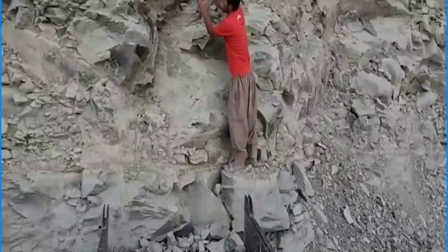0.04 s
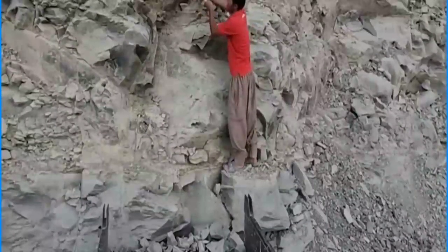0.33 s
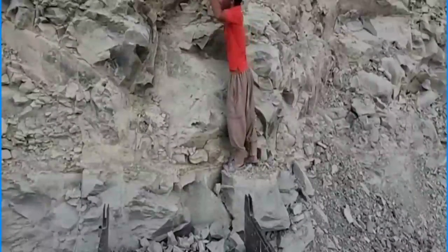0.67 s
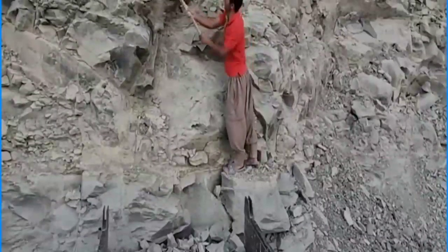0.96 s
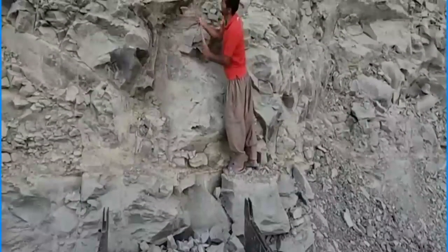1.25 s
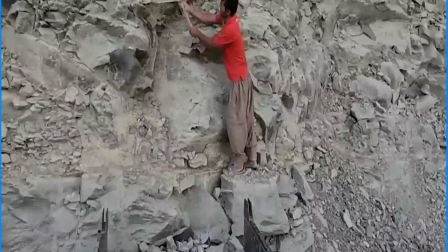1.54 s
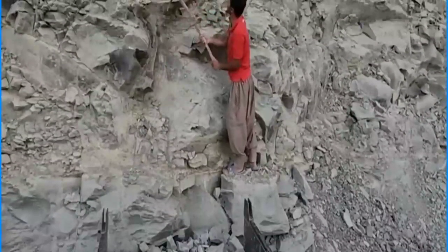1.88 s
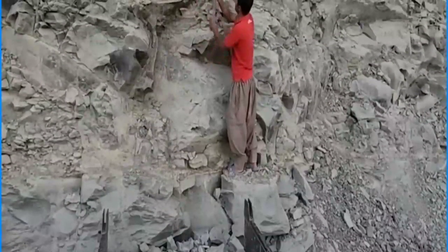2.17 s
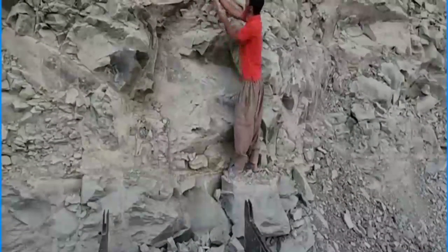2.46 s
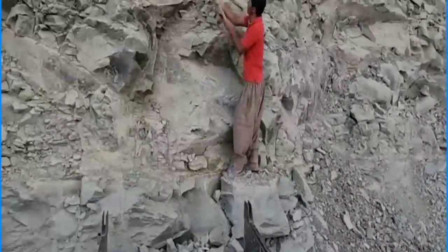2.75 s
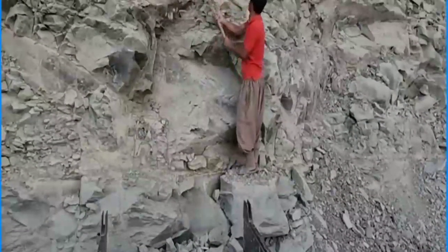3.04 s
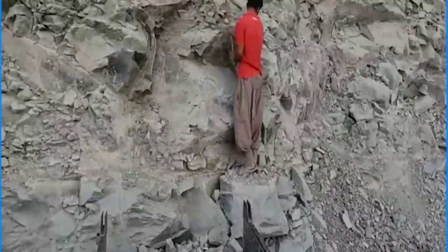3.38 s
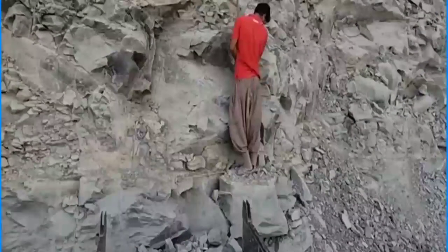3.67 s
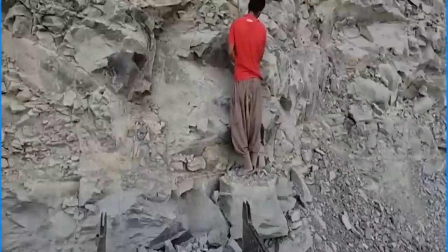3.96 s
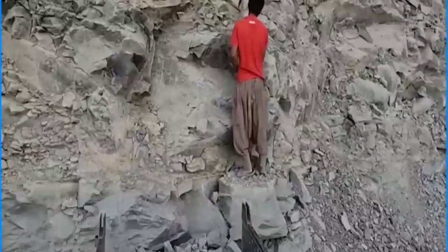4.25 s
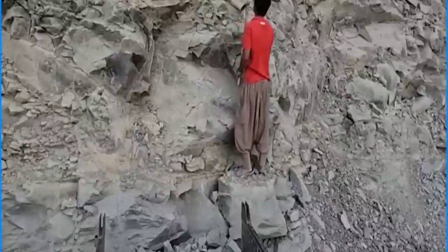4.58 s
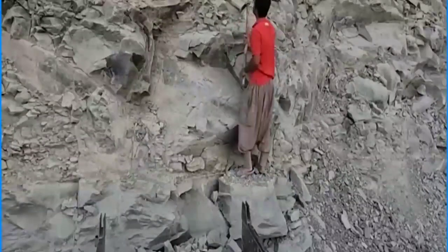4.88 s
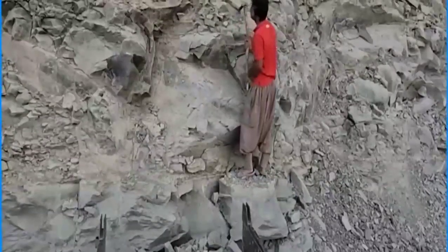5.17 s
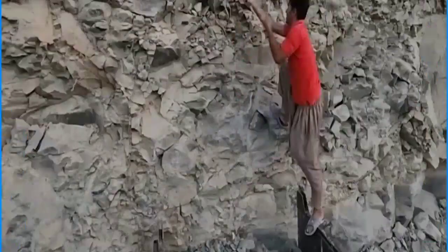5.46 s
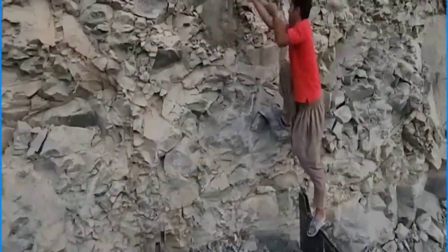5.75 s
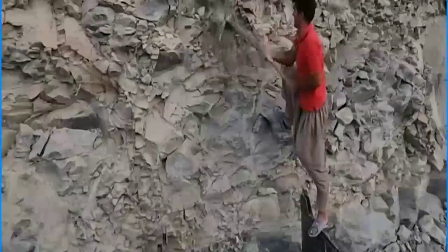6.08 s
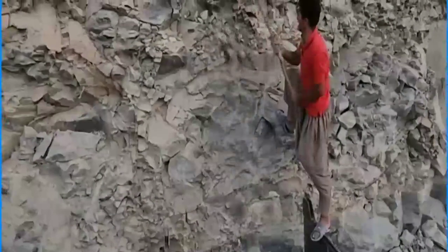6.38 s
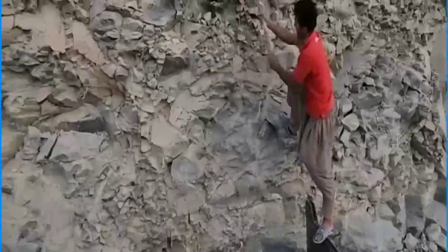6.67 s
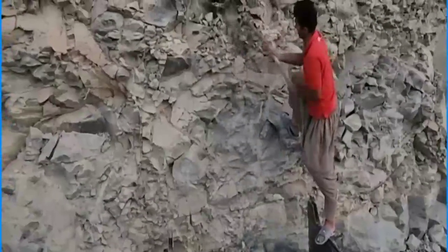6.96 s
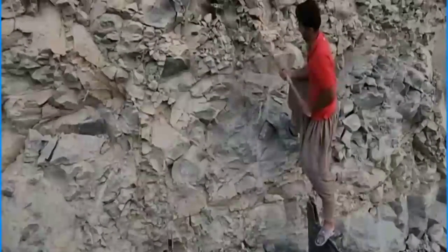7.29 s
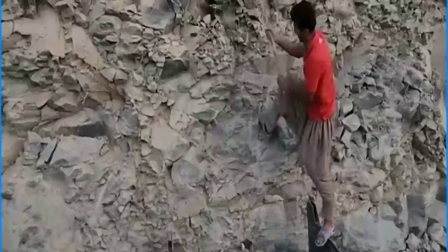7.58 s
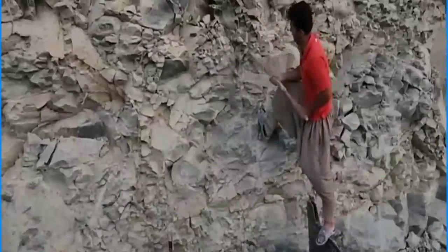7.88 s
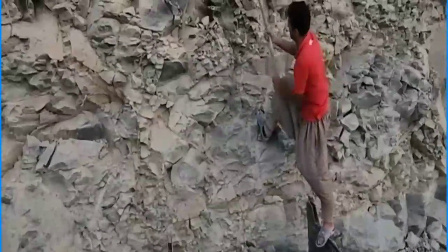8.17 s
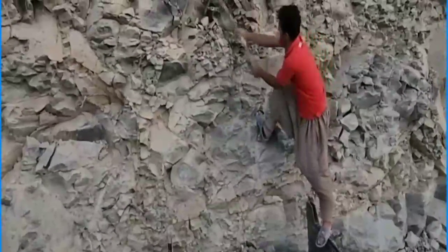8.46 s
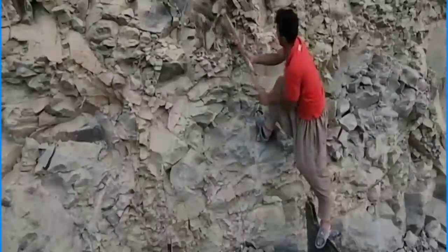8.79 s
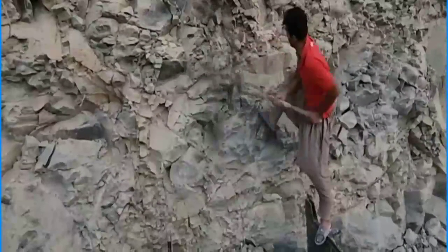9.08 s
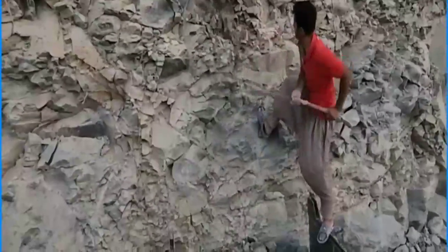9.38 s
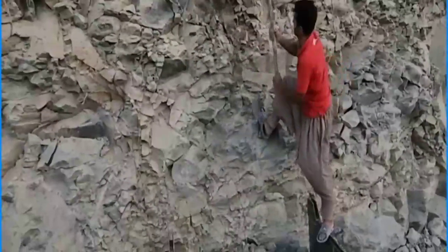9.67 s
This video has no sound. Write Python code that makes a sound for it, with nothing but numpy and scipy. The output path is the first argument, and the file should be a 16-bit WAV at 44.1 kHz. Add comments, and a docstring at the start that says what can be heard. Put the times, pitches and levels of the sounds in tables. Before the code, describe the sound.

A bar taps sharply on an outdoor quarry face, and stones crack loose, grinding and clinking down the slope with trickling pebbles and grit. Several clang and boom into a nearly empty steel truck bed. After a short lull with a puff of wind, a denser slide clatters onto the loaded bed, which thuds and rumbles. The sound is in stereo, with short echoes off the rock.

```python
"""Stones crack loose from a quarry face, pried with a bar, and clatter down into a steel truck bed.
Two closely spaced microphones hear the rock grind and clink, pebbles and grit trickle after it,
and short echoes come off the face. At first the bed is nearly empty and booms in its steel modes.
After a lull with a puff of wind on the microphones, a denser slide pours onto the load,
and the bed, its ring now shorter, thuds and rumbles."""
import sys
import numpy as np
from scipy import signal
from scipy.fft import rfft, irfft, next_fast_len
from scipy.io import wavfile
from scipy.ndimage import uniform_filter1d

SR = 44100
rng = np.random.default_rng(int(sys.argv[2]) if len(sys.argv) > 2 else 0)


def transcribe(u):
    """Save the signal u as a 16-bit wav file named by the first command-line argument.

    u: samples, shape (n,) or (channels, n), limited to [-1, 1]; the rate is SR.
    q: integer samples, one column per channel.
    """
    v = np.clip(np.atleast_2d(u).T, -1, 1)
    q = np.round(v * 32767).astype(np.int16)
    wavfile.write(sys.argv[1], SR, q)


N = 429093
TIME = np.arange(N) / SR
LEAD = 600  # samples of crushing before a stone gives way
CRUMBLE_S = 0.026  # hits that decay faster are clean taps, with little spray or spill

# louder stone hits: start_s, crack_db, thud_db, knock_db, fizz_db, decay_s, pitch_hz, clink_db
HITS = [(0.0473, -38.0, -59, -44, -38, 0.037, 1150, -42), (0.125, -27, -47, -38, -39, 0.026, 6600, -32),
        (0.191, -43, -62, -56, -49, 0.059, 7060, -42), (0.243, -36, -62, -47, -38, 0.03, 6520, -30),
        (0.337, -54, -55, -42, -51, 0.025, 2130, -46), (0.559, -52, -53, -42, -60.0, 0.03, 1260, -40),
        (0.6442, -26.5, -60.0, -37, -26, 0.015, 2060, -37), (0.677, -48, -62, -47, -52, 0.025, 2450, -45),
        (0.767, -33, -64.0, -42, -52.0, 0.033, 5400.0, -36), (0.829, -41, -58, -37, -55.0, 0.03, 1870, -42),
        (0.915, -49, -40, -33, -55, 0.022, 2310, -28), (0.964, -37, -62.0, -42, -62, 0.03, 2040, -32),
        (1.0145, -34.5, -47, -39, -47, 0.029, 2400, -40), (1.073, -53, -62, -44, -56, 0.028, 2020, -38),
        (1.1, -32, -28.5, -31.5, -36, 0.089, 1700, -34), (1.128, -30, -62.0, -35, -32.0, 0.055, 1350, -30),
        (1.149, -37, -32.5, -27, -48, 0.021, 1500, -25), (1.269, -31.0, -52, -35, -40, 0.04, 1670, -39),
        (1.282, -26, -33.5, -34, -32, 0.031, 1460.0, -35), (1.327, -30, -36, -30, -34, 0.026, 1270, -29),
        (1.378, -37, -58, -45, -44, 0.03, 2480, -41), (1.415, -22, -19, -26, -28, 0.09, 1500, -19),
        (1.4207, -16.5, -31, -14.5, -26, 0.13, 1143, -12.5),
        (1.5382, -30, -27, -29, -32.0, 0.21, 1040, -32), (1.594, -25, -35, -28, -36, 0.043, 1270, -25),
        (1.637, -25.5, -35, -36, -25, 0.027, 7500, -26), (1.662, -38, -31, -30, -46, 0.03, 1240, -26.5),
        (1.801, -41, -41, -45, -46, 0.024, 1270, -45), (1.896, -37.5, -44, -42, -43, 0.095, 1410, -42),
        (1.938, -35, -54, -42, -51, 0.04, 1850, -44), (1.973, -27, -32, -29.5, -38, 0.067, 990, -32),
        (2.021, -33, -51, -33, -40, 0.057, 6850.0, -31), (2.0852, -29, -47, -39, -30, 0.096, 6950, -27),
        (2.129, -43, -60, -43, -43, 0.022, 5900, -33), (2.194, -40, -50, -38.5, -50, 0.048, 4580, -44),
        (2.287, -25, -19.5, -25, -32, 0.17, 1393, -18), (2.375, -27, -52, -50, -45, 0.018, 6950, -32),
        (2.3894, -21, -47.0, -30, -31, 0.03, 5130, -23), (2.405, -31, -46, -24.5, -45, 0.026, 2240, -23),
        (2.4497, -40, -32, -30.5, -52.0, 0.16, 5100, -27), (2.472, -32, -40, -31, -42, 0.043, 1320, -34),
        (2.499, -35, -46, -34, -44, 0.033, 2060, -34), (2.534, -34, -42, -38, -45, 0.03, 2470, -36),
        (2.592, -39, -29.5, -31.5, -62, 0.046, 1530, -30.5), (2.692, -24, -43, -34, -27, 0.0092, 2300, -29),
        (2.7368, -28, -60, -37, -37, 0.13, 1240, -35), (2.76, -37, -55.0, -47, -49, 0.034, 5400, -30),
        (2.8055, -38, -47, -32, -55, 0.023, 2070, -29), (2.873, -33, -55, -34, -34, 0.03, 2130, -35),
        (2.916, -40, -56, -43, -47, 0.023, 7500, -42), (2.952, -43, -62, -40, -45, 0.03, 2130, -39),
        (2.998, -31, -61, -56, -67, 0.1, 4750, -32), (3.036, -22, -23, -27, -31, 0.13, 1250.0, -25),
        (3.0804, -37, -44, -22.5, -49.0, 0.02, 1045, -20), (3.1347, -31, -47, -47, -30, 0.072, 1500, -46),
        (3.1628, -18, -25, -28, -31, 0.024, 2500.0, -25), (3.187, -34, -42.5, -27, -46.0, 0.067, 2470, -25),
        (3.211, -29, -42.0, -27, -42.0, 0.018, 1100, -33), (3.239, -12, -34, -36, -29, 0.022, 5250, -23),
        (3.264, -24, -52, -32, -27, 0.042, 2620, -26), (3.3135, -22.5, -51, -26, -44.0, 0.15, 1860, -35),
        (3.34, -12, -15.5, -16.5, -24, 0.1, 1413, -15.5), (3.3559, -13.5, -29, -22, -23, 0.089, 1800, -22),
        (3.4195, -22.5, -43.0, -50, -22, 0.054, 5100, -21), (3.44, -20, -14, -38, -41, 0.045, 1520, -17.5),
        (3.478, -20.5, -45.0, -41, -35, 0.11, 7240.0, -22), (3.517, -22, -15, -20.5, -44, 0.12, 1120, -25),
        (3.5688, -8.5, -28, -13, -36, 0.064, 1115, -10.5),
        (3.5775, -19.5, -18, -33, -34, 0.12, 1390, -13.5), (3.679, -31, -45, -31, -33, 0.2, 1105, -23),
        (3.709, -19.5, -50, -44, -22, 0.11, 5900, -19), (3.789, -37, -41, -39, -37, 0.078, 1440, -39),
        (3.8357, -17, -45, -21.5, -45, 0.14, 2370, -34), (4.051, -37.5, -46, -42.5, -49, 0.24, 1200, -51),
        (4.102, -57, -33, -42, -57, 0.046, 1180, -39), (4.145, -42, -60, -66, -46, 0.02, 6500, -34.5),
        (4.439, -60, -73, -75, -53, 0.026, 6400, -66), (4.621, -63, -62, -66, -72.5, 0.017, 6300, -62.5),
        (4.675, -70.5, -56, -59, -76, 0.05, 1630, -62), (4.798, -65, -60.5, -72, -74, 0.019, 6320, -65),
        (4.9, -66, -51, -66, -72.0, 0.18, 5370, -63), (5.43, -66.5, -64, -59, -71, 0.05, 5500, -59),
        (5.5065, -21, -26, -22, -22, 0.12, 1476, -21.5), (5.647, -28, -58, -22, -33, 0.14, 3370, -16.5),
        (5.685, -30, -48, -38, -23, 0.052, 1104, -24.5), (5.824, -38, -34.5, -31.5, -29, 0.11, 1736, -28),
        (5.847, -33, -40, -34, -25.5, 0.036, 2240.0, -36), (5.916, -30, -57, -46, -31, 0.06, 2070.0, -31),
        (5.931, -21, -62, -31, -20.5, 0.32, 3000, -34), (5.9723, -18, -51.0, -32, -25, 0.067, 6480.0, -16),
        (5.986, -18, -47, -29, -20.5, 0.3, 4080, -20), (6.0657, -33, -41, -31, -23, 0.055, 940, -28),
        (6.0978, -13, -52, -23, -22, 0.13, 6670, -12), (6.164, -22, -57, -42.0, -17.0, 0.025, 7360, -24),
        (6.1824, -20.5, -44, -27, -18, 0.11, 2420, -21), (6.2114, -23, -58, -24, -22, 0.22, 1244, -25.5),
        (6.269, -24, -53, -37, -36, 0.06, 6780, -12), (6.305, -15, -48, -14, -20, 0.19, 1876, -16),
        (6.333, -12, -40, -30, -16, 0.18, 1244, -18), (6.428, -17.5, -20.5, -37, -40.0, 0.082, 6660, -18),
        (6.475, -22, -44, -25, -26, 0.16, 1880, -26), (6.507, -15, -25, -20, -26, 0.077, 4170, -13.5),
        (6.5534, -36, -25, -35, -22, 0.017, 910, -28), (6.639, -34, -43, -36, -39, 0.025, 1250, -33),
        (6.6733, -10, -38, -15.5, -18.5, 0.25, 2060, -16.5),
        (6.74, -21, -46, -21.5, -18.5, 0.23, 1230.0, -29), (6.7601, -12, -42, -17, -19, 0.1, 1150, -31),
        (6.8891, -28, -28.5, -27, -31, 0.3, 2000, -28), (6.945, -26, -27, -34, -24.5, 0.16, 7530, -20),
        (7.002, -45, -52, -35, -41, 0.019, 3120, -37), (7.038, -29.5, -37, -37, -31, 0.18, 7250, -24.5),
        (7.1735, -22.5, -52.0, -31, -26.5, 0.024, 4040, -26.5),
        (7.251, -33, -54, -54, -33, 0.036, 6830, -30), (7.2727, -20.5, -52, -30, -13, 0.042, 6680.0, -15),
        (7.2919, -15.5, -44, -23.5, -13, 0.057, 6360, -22),
        (7.3807, -26, -31.5, -29.5, -27, 0.052, 1620, -28),
        (7.4946, -16.5, -38, -46, -18, 0.035, 5200, -20), (7.5405, -15, -52.0, -16, -39, 0.018, 1520, -17),
        (7.595, -32, -36, -43, -28, 0.03, 3350, -27), (7.6553, -24.0, -46, -30, -36, 0.098, 1510, -31),
        (7.6803, -20.5, -51.0, -26.5, -23.5, 0.25, 5180, -17),
        (7.7918, -26.5, -53, -28, -36, 0.021, 4100, -25.5),
        (7.9217, -14.5, -31, -24.5, -14, 0.065, 4020, -21), (8.022, -50, -31, -33, -55, 0.07, 1170, -40),
        (8.1015, -32, -39, -53, -28.5, 0.11, 7460, -39), (8.1255, -23.5, -27, -49, -31, 0.014, 6900, -28),
        (8.234, -32, -56, -60, -25, 0.026, 5650, -29), (8.291, -22, -44, -24.5, -29, 0.02, 4960, -24),
        (8.354, -34, -38, -39, -42, 0.025, 4520, -35), (8.399, -38, -45, -40, -29, 0.049, 2070, -42),
        (8.4273, -17.5, -38, -23, -22, 0.033, 7460, -15), (8.517, -50, -42, -40, -40, 0.031, 900, -38),
        (8.559, -59, -30, -52, -51, 0.05, 1190, -28.5), (8.663, -36, -33, -40, -39, 0.22, 870, -27.5),
        (8.7486, -32, -36, -42, -32, 0.099, 1140, -38), (8.806, -42, -45, -44, -35, 0.04, 5320, -35),
        (8.838, -41, -37, -33, -36, 0.04, 2300, -36), (8.872, -34, -50, -29, -35, 0.074, 1390, -33),
        (8.909, -28, -39, -27.5, -34, 0.024, 1120, -22), (8.977, -33, -48, -37, -41, 0.03, 5100, -29),
        (9.024, -34, -33, -34, -44, 0.029, 1850, -42), (9.0706, -19, -28, -26, -23.5, 0.02, 5170.0, -22),
        (9.144, -15, -27, -32, -16, 0.023, 3370, -17.5), (9.161, -23, -44, -38, -17, 0.069, 8830, -18),
        (9.185, -19, -40, -28.5, -23, 0.092, 5200, -28),
        (9.2029, -14.5, -27.5, -23, -18.5, 0.31, 2060, -24),
        (9.2438, -9.5, -46, -19, -19, 0.038, 6270.0, -9), (9.301, -40, -22, -36, -36, 0.045, 1460.0, -28),
        (9.358, -16.5, -33, -29, -16, 0.083, 1125, -19), (9.372, -17.5, -37, -35, -23, 0.1, 3320, -25),
        (9.44, -20.5, -22.5, -30, -18, 0.071, 846, -26), (9.5163, -24.5, -35, -45, -38, 0.03, 4100, -36),
        (9.532, -20.5, -43, -38, -25, 0.069, 4140, -22), (9.6255, -17, -46.0, -42, -43, 0.018, 960, -30),
        (9.642, -42, -27, -38, -42, 0.033, 1220, -23.5), (9.6553, -29, -23, -48, -24.5, 0.073, 845, -23),
        (9.697, -51, -36, -41, -44, 0.07, 944, -25)]
# thin flow of debris before the lull: time_s, pebble_db, grit_db
TRICKLE = [(0.0, -44, -58.5), (0.32, -50.5, -54.5), (0.53, -48.5, -55.5), (0.7, -51.5, -46),
           (0.93, -50.5, -48), (1.12, -51.5, -46), (1.35, -49, -48.5), (1.5, -40, -45), (1.72, -52, -50.5),
           (1.8, -50, -48), (1.865, -60, -56.5), (1.95, -46.5, -48), (2.25, -57, -49), (2.33, -58, -36),
           (2.48, -53, -44.5), (2.83, -40.5, -40), (2.97, -53.5, -43.5), (3.09, -39, -35.5),
           (3.21, -38.5, -38), (3.42, -31.5, -30.5), (3.56, -26.5, -26.5), (3.74, -38.5, -55.5),
           (3.86, -29, -44.5), (4.02, -47, -51.5), (4.2, -55, -53.5), (4.38, -81.5, -72.5),
           (4.73, -69, -78.5), (5.46, -78, -78.5)]
# dense flow after the lull: time_s, pebble_db, grit_db
SLIDE = [(5.53, -36, -62), (5.66, -54, -22.5), (5.72, -46, -32), (5.94, -87, -33.5), (6.03, -42, -27),
         (6.13, -62, -23.5), (6.32, -44, -22), (6.48, -27.5, -26.5), (6.65, -34, -32), (6.8, -25, -53),
         (6.99, -59, -44.5), (7.21, -42.5, -46), (7.46, -37, -35), (7.6, -58, -31), (7.94, -37, -50),
         (8.18, -54, -46.5), (8.34, -52, -45), (8.62, -40, -50), (8.8, -43, -36.5), (9.03, -54, -46),
         (9.15, -44, -48), (9.31, -25.5, -32), (9.45, -35.5, -38.5), (9.64, -36, -29.5), (9.73, -26, -40)]
# how alike the two microphones hear: frequency_hz, correlation
MIC_LIKENESS = [(60, .9), (300, .82), (700, .8), (1400, .76), (3000, .33), (7000, .1), (15000, .15)]


def amp(db):
    return 10 ** (np.asarray(db) / 20)


def unit(x):
    return x / np.sqrt(np.mean(x ** 2) + 1e-20)


def read(points, hz):
    """A spectrum joined by straight lines on a log frequency axis."""
    f, value = np.transpose(points)
    return np.interp(np.log(hz + 1), np.log(f + 1), value)


def level(rows, column):
    """One dB column of a time curve as a gain, silent outside its span."""
    times, db = np.array(rows)[:, [0, column]].T
    inside = np.interp(TIME, [times[0] - .015, times[0], times[-1], times[-1] + .015], [0, 1, 1, 0])
    return inside * amp(np.interp(TIME, times, db))


def flicker(size, *widths):
    """A random wobble of unit strength, smoothed over each width in samples."""
    wobble = rng.standard_normal(size)
    for width in widths:
        wobble = uniform_filter1d(wobble, width)
    return unit(wobble)


def add(mix, start_s, sound):
    part = mix[:, max(round(start_s * SR), 0):][:, :sound.shape[1]]
    part += sound[:, :part.shape[1]]


def play(rows, voice):
    """Places one sound for each row of an event table."""
    out = np.zeros((2, N))
    for start_s, *row in rows:
        add(out, start_s, voice(*row))
    return out


def coloured(pair, colour):
    """Gives two signals a colour (frequency_hz, level_db), alike in the bass as at close microphones."""
    size = next_fast_len(pair.shape[1])
    spectra, hz = rfft(pair, size), np.fft.rfftfreq(size, 1 / SR)
    angle = np.arcsin(np.clip(read(MIC_LIKENESS, hz), 0, 1)) / 2
    blended = np.cos(angle) * spectra + np.sin(angle) * spectra[::-1]
    return unit(irfft(blended * amp(read(colour, hz)), size)[:, :pair.shape[1]])


def noise(colour, size=N):
    return coloured(rng.standard_normal((2, size)), colour)


def chips(per_s, low_hz, high_hz, spread_db, t60, kinds=36):
    """Small stones, each a sharp tick with a few short modes, fall at random and bounce once."""
    t, out = np.arange(1400) / SR, np.zeros((2, N))
    for hz in np.geomspace(low_hz, high_hz, kinds):
        partials = hz * rng.uniform(.7, 1.8, (4, 1))
        modes = np.sin(2 * np.pi * (partials * t + rng.random((2, 4, 1)))).mean(1)
        tick = .42 * rng.standard_normal((2, len(t))) * np.exp(-t / .002)
        chip = (modes + tick) * amp(-60 * t / t60) * (1 - np.exp(-t / .0003))
        wait, weight, hop = rng.exponential(1, (3, 2500))
        falls = np.cumsum(wait * kinds * SR / per_s).astype(int)
        bounces = falls + (hop * .03 * SR).astype(int)
        sizes = amp(spread_db * np.minimum(weight, 3.2))
        train = np.bincount(np.r_[falls, bounces].clip(0, N), np.r_[sizes, .5 * sizes], N + 1)[:N]
        out += signal.oaconvolve(train[None], chip, axes=1)[:, :N]
    return out


def flow_with_spills(flow, rise_s=0.011, t60=0.18):
    """Gains of pebbles and grit: each hit spills pebbles by its knock and grit by its crack."""
    t, spill_power = np.arange(0, .5, 1 / SR), np.zeros((2, N))
    fade = (1 - np.exp(-t / rise_s)) * amp(-60 * t / t60)
    for start_s, crack_db, _, knock_db, _, decay_s, *_ in HITS:
        if flow[0][0] < start_s < flow[-1][0]:
            strength = amp([[knock_db - 21.5], [crack_db - 23.5]]) * min(decay_s / CRUMBLE_S, 1)
            add(spill_power, start_s, (strength * fade) ** 2)
    return np.sqrt(spill_power + np.array([level(flow, 1), level(flow, 2)]) ** 2)


def debris(flow, pebble_db, grit_db, pebbles_per_s, grit_per_s, dust_db):
    """Pebbles knock and grit ticks down the slope in clumps and spurts, over a hiss of dust."""
    # spectra of pebbles and of grit: frequency_hz, level_db
    pebble_colour = [(150, -21), (400, 5), (700, 2), (1400, 3), (2300, -3.5), (3500, -24.5), (7000, -29)]
    grit_colour = [(1000, -8.5), (2400, -2.5), (3600, -7), (5200, -4.5), (7000, -2.5), (8500, -4.5),
                   (12000, -4), (14500, -11), (16000, -17)]
    pebbles = unit(chips(pebbles_per_s, low_hz=650, high_hz=3000, spread_db=2.5, t60=.036))
    grit = unit(chips(grit_per_s, low_hz=2600, high_hz=11000, spread_db=4.3, t60=.024))
    dust = amp(dust_db) * rng.standard_normal((2, N))
    clumps = unit(amp(2.5 * flicker(N, 380, 120)))
    spurts = unit(amp(1.03 * flicker(N, 2200, 900)))
    pebble_flow, grit_flow = clumps * spurts * flow_with_spills(flow)
    return (amp(pebble_db) * pebble_flow * coloured(pebbles + dust, pebble_colour)
            + amp(grit_db) * grit_flow * coloured(grit + dust, grit_colour))


def bed_panel(hold_s=0.44, ring_fade_db_per_s=37.5, boom_fade_db_per_s=150):
    """A thin stream of grit drums on one panel of the bed; the boom stops first as the stream thins."""
    thinning_s = np.maximum(TIME - hold_s, 0)
    ring = noise([(200, -83), (380, -16.5), (432, -2.5), (470, -3.5), (540, -18), (800, -24),
                  (2000, -78.5)])
    boom = noise([(50, -31.5), (100, -1.5), (170, 6.5), (260, -19), (600, -46), (3000, -90)])
    return (amp(-39 - ring_fade_db_per_s * thinning_s) * ring
            + amp(-43 - boom_fade_db_per_s * thinning_s) * boom)


def bare_rumble(usual_flow_db=-42):
    """The nearly empty bed rumbles under the trickle, swelling with the flow of pebbles."""
    # spectrum of the bare bed: frequency_hz, level_db
    rumble_colour = [(30, -40), (55, -23), (85, -12), (130, -3), (190, -2.5), (280, -10), (420, -6),
                     (700, -15), (1500, -27.5), (4000, -74.5)]
    swell = (level(TRICKLE, 1) / amp(usual_flow_db)) ** 0.65
    return amp(-44) * swell * noise(rumble_colour)


def wind(waver_db=2, rise_share=0.16):
    """A wavering breeze on the microphones, with gusts that rise quickly and die away."""
    # strength of the breeze: time_s, level_db
    breeze = [(0, -64), (.52, -48), (.66, -76), (1.3, -53), (1.45, -56), (2.1, -63), (2.25, -46.5),
              (3.0, -53), (3.6, -60), (4.4, -63.5), (5.45, -61.5), (5.52, -50.5), (6.3, -39.5),
              (6.6, -44.5), (8.75, -55), (9.7, -46)]
    # gusts: peak_s, level_db, length_s
    gusts = [(2.62, -34, 0.042), (2.814, -37, 0.039), (4.774, -35.5, 0.11), (5.684, -38, 0.14),
             (6.28, -37.5, 0.15), (7.21, -48, .2), (8.316, -42, .1), (9.496, -29.5, 0.07)]
    # spectrum of the buffeting: frequency_hz, level_db
    wind_colour = [(12, -32.5), (28, -10), (50, -3.5), (85, 2.5), (130, -3.5), (250, -14), (800, -48),
                   (3000, -78.5)]
    waver = unit(sum(np.sin(2 * np.pi * (hz * TIME + rng.random())) for hz in np.geomspace(2, 8, 10)))
    power = (level(breeze, 1) * amp(waver_db * waver)) ** 2
    for peak_s, db, length_s in gusts:
        age = (TIME - peak_s) / length_s
        power += (amp(db) * np.exp(-np.maximum(age, -age / rise_share))) ** 2
    return np.sqrt(power) * noise(wind_colour)


def still_air():
    """The faint hush of the open quarry."""
    # spectrum of the air: frequency_hz, level_db
    air_colour = [(30, -13.5), (120, -9.5), (400, -19), (1000, -25.5), (3000, -26.5), (6500, -29.5),
                  (13000, -38.5), (16000, -42.5)]
    return amp(-70) * noise(air_colour)


def clink(t, pitch_hz, shape_spread=.06):
    """The modes of an angular stone; no two are cut alike, so the upper ones scatter."""
    # stone modes: pitch_ratio, level_db
    stone_modes = [(1, 1.5), (1.07, -2.5), (1.27, -16.5), (1.62, -19.5), (2.3, -12)]
    ratio, db = np.transpose(stone_modes)[:, :, None]
    hz = pitch_hz * ratio * np.exp(shape_spread * rng.standard_normal(ratio.shape) * (ratio > 1))
    apart = .5 * (1 - read(MIC_LIKENESS, hz))  # low modes reach both microphones nearly in step
    return (amp(db) * np.sin(2 * np.pi * (hz * t + apart * rng.random((2, len(hz), 1))))).sum(1)


def stone_hit(crack_db, thud_db, knock_db, fizz_db, decay_s, pitch_hz, clink_db, spray_db=-26):
    """A brittle edge crushes, bursts through the stone's resonances and clinks; splinters spray after."""
    size, hold_s = 7000, 0.0023
    t, decay_s = (np.arange(size) - LEAD) / SR, np.clip(decay_s, .015, .2)
    swell, age = np.exp(np.minimum(t, 0) / .0014), np.maximum(t - hold_s, 0)
    resonance_hz, resonance_db = np.geomspace(500, 16000, 70), 4 * rng.standard_normal(70)
    resonances = amp(np.interp(np.fft.rfftfreq(size, 1 / SR), resonance_hz, resonance_db))
    crumbling = unit(amp(2.3 * flicker(size, 40)))
    spray_t60 = 0.74 * min(decay_s / CRUMBLE_S, 1) ** 2
    spray = amp(spray_db - 60 * age / spray_t60)
    # lumps thud, edges knock and crack, dust fizzes: level_db, decay_factor, colour
    bands = [
        (thud_db + .5, 1.2, [(30, -48), (80, -4), (160, 4.5), (550, 5.5), (1000, -13.5), (3000, -56)]),
        (knock_db - .5, 1.1,
         [(300, -15), (800, -7.5), (1500, -2.5), (2400, -1), (3500, -11.5), (8000, -42)]),
        (crack_db - .5, .95, [(1200, -29.5), (2800, -4.5), (7000, 0), (9000, -10.5), (16000, -30)]),
        (fizz_db + .5, .95, [(4000, -44), (8300, -1.5), (12000, -1.5), (16000, -16)])]
    crush = np.zeros((2, size))
    for db, linger, colour in bands:
        burst = unit(irfft(rfft(noise(colour, size)) * resonances))
        crush += amp(db) * burst * (amp(-60 * age / (decay_s * linger)) + spray)
    clink_t60 = min(decay_s, .055 * min(2000 / pitch_hz, 1) ** .5)  # small, high stones die sooner
    ring = clink(t, pitch_hz) * amp(clink_db - 2.5 - 60 * age / clink_t60)
    pan = amp(np.array([[-.1], [.1]]) * rng.standard_normal())
    return (crush * crumbling + ring * unit(crumbling ** 0.88)) * swell * pan


def rock_face(dry, wet_db=-7.5, t60=0.072, size=10000):
    """The broken face close by scatters a short spray of echoes."""
    t = np.arange(size) / SR
    echoes = rng.standard_normal((2, size)) * (rng.random((2, size)) < .05)
    echoes *= (t > .006) * amp(-60 * t / t60)
    return dry + amp(wet_db) * signal.oaconvolve(dry, echoes / np.linalg.norm(echoes[0]), axes=1)[:, :N]


def slab_thump(db, hz, t60=0.023, sag_s=0.021):
    """A slab shifts with one short, sinking thump."""
    t = np.arange(3000) / SR
    turns = hz * sag_s * np.log1p(t / sag_s)
    return np.tile(amp(db - 60 * t / t60) * np.sin(2 * np.pi * turns), (2, 1))


def pry_bar():
    """The bar taps the face drily, with hardly any spray, and shoves a loose slab."""
    # taps: start_s, crack_db, thud_db, knock_db, fizz_db, decay_s, pitch_hz, clink_db
    bar_taps = [(0.1072, -14, -28, -14.5, -23.5, 0.012, 1015, -16),
                (0.111, -17, -20, -34, -25.5, 0.016, 6630, -19),
                (4.3075, -37.5, -36, -39, -62, 0.027, 3425, -39.5)]
    # shove of the slab: start_s, level_db, pitch_hz
    shoves = [(0.1125, -17, 170)]
    taps = play(bar_taps, lambda *tap: stone_hit(*tap, spray_db=-34))
    return np.roll(taps, -LEAD, axis=1) + play(shoves, slab_thump)


def scrapes():
    """Rock grinds on rock: countless tiny slips crunch and sizzle, swelling until it gives way."""
    # grinds: peak_s, swell_s, fade_s, crunch_db, sizzle_db
    grinds = [(0.44, 0.042, 0.03, -54, -42), (0.75, 0.068, 0.05, -56, -59), (0.87, 0.079, 0.032, -51, -46),
              (1.416, 0.0091, 0.0054, -19, -16), (2.291, 0.0072, 0.012, -31, -32),
              (2.035, 0.0085, 0.0084, -43, -26), (3.345, 0.016, 0.025, -29, -36),
              (3.579, 0.008, 0.032, -21.5, -36), (3.74, 0.093, 0.11, -33, -34),
              (3.845, 0.015, 0.012, -33, -26), (6.314, 0.007, 0.02, -25.5, -34),
              (6.772, 0.013, 0.038, -28, -34), (7.57, 0.016, 0.043, -36.5, -29.5),
              (8.426, 0.014, 0.013, -33, -21.5), (8.69, 0.015, 0.015, -45, -35),
              (9.073, 0.0053, 0.004, -31, -38), (9.145, 0.012, 0.006, -31, -17.5),
              (9.36, 0.018, 0.012, -26, -24)]
    # spectra of the slips: frequency_hz, level_db
    crunch_colour = [(200, -25.5), (500, 0), (850, -3), (1400, -5), (2000, -4.5), (3000, -14), (6000, -34)]
    sizzle_colour = [(1500, -23), (3000, -8), (5200, -6), (7400, -1), (8400, -5.5), (12000, -6.5),
                     (16000, -18)]
    t, power = np.arange(-.3, .3, 1 / SR), np.zeros((2, N))
    for peak_s, swell_s, fade_s, crunch_db, sizzle_db in grinds:
        envelope = np.exp(np.minimum(t / swell_s, -t / fade_s))
        add(power, peak_s + t[0], (amp([[crunch_db], [sizzle_db]]) * envelope) ** 2)
    crunch_gain, sizzle_gain = np.sqrt(power)
    crunch = chips(per_s=1500, low_hz=550, high_hz=2000, spread_db=2.5, t60=.022, kinds=12)
    sizzle = chips(per_s=3000, low_hz=3000, high_hz=9000, spread_db=2.5, t60=.012, kinds=12)
    return crunch_gain * coloured(crunch, crunch_colour) + sizzle_gain * coloured(sizzle, sizzle_colour)


def bed_blow(clang_db, boom_db, knock_db, knock_hz, ring_share, size=80000):
    """A rock knocks dully on the bed and rings its modes, weighted anew by each landing spot."""
    # modes of the steel bed: pitch_hz, level_db, full_t60_s
    bed_modes = [(92, -9.5, 2.3), (109.2, 5, 0.67), (146.4, -5, 1.7), (173.8, -2, 1.1), (192.3, -12.5, 1.9),
                 (287, -21, 1.9), (328.7, -12.5, 2.43), (353.5, 1, 0.7), (389, -7, 1.6), (448, 0.5, 0.97),
                 (477.5, 1.5, 0.85), (507, -2.5, 0.45), (550, -5.5, 0.55), (659, -1, 0.52), (706, -7, 0.66),
                 (735, -17, 1.6), (916, -17.5, 0.7), (1033, -7, 0.68), (1155, -13, 0.96), (1374, -5, 0.4),
                 (1470, -13, 0.45)]
    t = np.arange(size) / SR
    hz, db, t60 = np.transpose(bed_modes)[:, :, None]
    drive_db = np.where(hz < 250, boom_db + 2.5, clang_db - 6.8)
    weight = amp(db + drive_db + 1.2 * rng.standard_normal(hz.shape))
    # each mode reaches the two microphones with its own delay
    phase = 2 * np.pi * rng.random(len(hz)) + .35 * rng.standard_normal((2, len(hz)))
    ringing = weight * np.exp((2j * np.pi * hz - np.log(1000) / (t60 * ring_share)) * t)
    modes = (np.exp(1j * phase) @ ringing).real
    modes *= 1 + .26 * flicker(size, 900, 500)  # loose stones jostle on the steel
    # countless weaker plate modes fill the gaps
    plate = noise([(25, -50), (60, -15), (100, -2.5), (240, -26.5), (370, -1.5), (520, 1), (800, -9.5),
                   (1400, -8), (2500, -16.5), (6000, -55)], size)
    plate *= amp(clang_db - 5 - 60 * t / (0.49 * ring_share))
    knock = amp(knock_db - 60 * t / .11) * np.sqrt(2) * np.sin(2 * np.pi * knock_hz * t)
    low_cut = signal.butter(4, 66, "high", fs=SR, output="sos")
    return signal.sosfilt(low_cut, (modes + plate + knock) * (1 - np.exp(-t / 0.0016)))


def landings(loaded_s=5.505, bare_ring=0.94, loaded_ring=0.77):
    """Rocks drop into the bed below the face; under a load of stone its ring dies sooner."""
    # blows on the steel: start_s, clang_db, boom_db, knock_db, knock_hz
    blows = [(1.416, -2, -23, 5, 523), (1.447, -33, -25, -14, 426), (1.479, -32, -43, -1.5, 459),
             (1.589, -14.5, -23.5, -15, 620), (2.285, -18.5, -25, -20, 653), (2.306, -33, -43, -13, 496),
             (2.346, -26.5, -32, -12, 358), (2.633, -28, -30, -20, 440), (3.036, -21, -30, -16, 437),
             (3.162, -31, -51, -22, 510), (3.339, -15, -22, -7.5, 496), (3.368, -20, -26, -22, 343),
             (3.439, -13, -35, -1.5, 540), (3.566, -10.5, -25.5, -14, 700), (3.708, -14, -26, -25, 374),
             (3.944, -31, -36, -19, 355), (6.552, -27, -26, -14, 308), (6.574, -23, -28, -16, 163),
             (6.674, -24, -28, -11, 330), (6.752, -10, -53, -7.5, 340), (6.892, -15.5, -26, -8, 337),
             (6.9, -24, -43, -11, 573), (7.293, -30, -43, -14, 727), (7.923, -25, -40, -18, 635),
             (9.357, -16, -29, -10, 504)]
    return play([(s, *blow, bare_ring if s < loaded_s else loaded_ring) for s, *blow in blows], bed_blow)


def cobbles():
    """Larger stones knock against each other, loudest where the slide runs thickest."""
    knocks = chips(per_s=65, low_hz=800, high_hz=5000, spread_db=2, t60=.045, kinds=18)
    thickness = np.hypot(level(SLIDE, 1), level(SLIDE, 2))
    return amp(-3) * thickness * coloured(knocks, [(300, -25), (1000, -1), (7000, 2.5), (14000, 12)])


def loaded_rumble():
    """The slide drums on the loaded bed, by turns deep and hollow."""
    # strength of the drumming: time_s, deep_db, hollow_db
    drumming = [(5.53, -31, -39.5), (5.95, -38.5, -45.5), (6.3, -35.5, -49), (6.9, -39, -31.5),
                (7.15, -34, -46), (7.5, -32.5, -36.5), (7.95, -35, -32), (8.25, -33, -40),
                (8.7, -37.5, -31), (9.1, -31, -37.5), (9.73, -43, -30.5)]
    # spectra of the loaded bed: frequency_hz, level_db
    deep_colour = [(30, -19), (80, -6), (130, -1.5), (190, 1), (280, -12), (500, -17.5), (1500, -40),
                   (4000, -75)]
    hollow_colour = [(60, -27.5), (150, -2.5), (230, 2.5), (320, 0), (480, -7), (700, -11), (1500, -25),
                     (4000, -66)]
    return level(drumming, 1) * noise(deep_colour) + level(drumming, 2) * noise(hollow_colour)


def scene():
    """Stones and debris echo off the face; the bed rings and rumbles below; wind and air lie around."""
    stones = amp(-2) * np.roll(play(HITS, stone_hit), -LEAD, axis=1)
    bed = amp(-9.5) * landings() + bed_panel() + bare_rumble() + loaded_rumble()
    trickle = debris(TRICKLE, pebble_db=-3.5, grit_db=1.5, pebbles_per_s=280, grit_per_s=1000, dust_db=-2)
    slide = debris(SLIDE, pebble_db=-1, grit_db=1, pebbles_per_s=400, grit_per_s=800, dust_db=0)
    air = amp(6.5) * wind() + still_air()
    return rock_face(stones + trickle + slide + cobbles() + scrapes()) + pry_bar() + bed + air


def record(dry):
    """Each microphone has its own treble; the hardest cracks overload the recorder; the top is cut."""
    # imbalance of the microphones: frequency_hz, left_minus_right_db
    mic_tilt = [(100, 0.8), (700, 0), (2300, 0.1), (4400, -1), (6500, -6.5), (9000, -1), (12000, 3),
                (16000, -1)]
    size = next_fast_len(N)
    tilt = amp(np.array([[.5], [-.5]]) * read(mic_tilt, np.fft.rfftfreq(size, 1 / SR)))
    heard = np.clip(irfft(rfft(dry, size) * tilt, size)[:, :N], -1, 1)
    band_limit = signal.firwin(401, cutoff=16000, window=("kaiser", 8), fs=SR)
    return signal.oaconvolve(heard, band_limit[None], "same")


dry = scene()
out = record(dry)
transcribe(out)
```